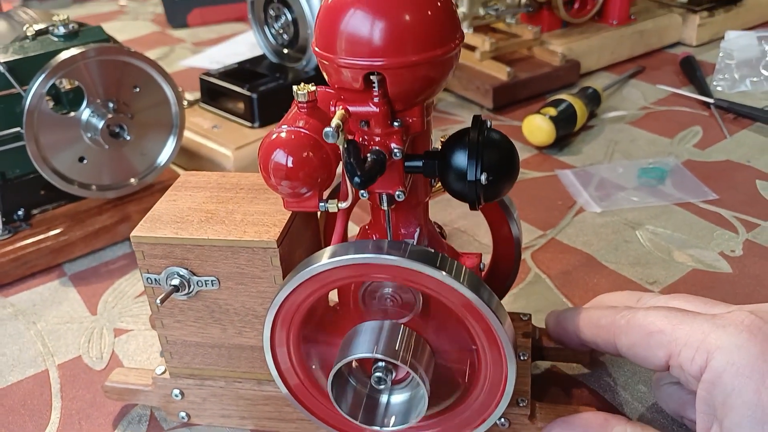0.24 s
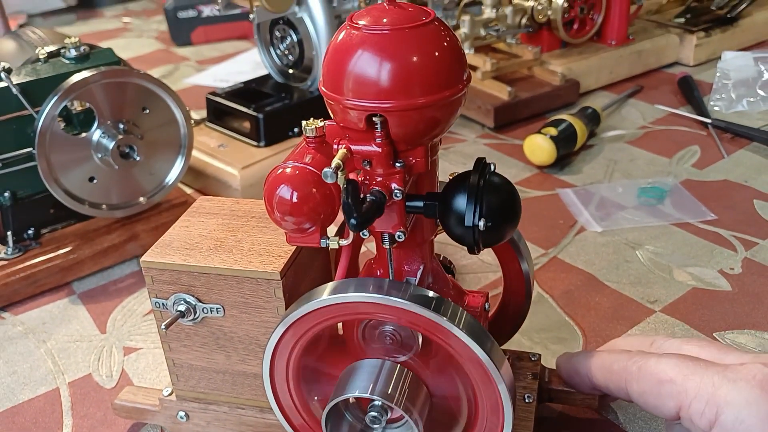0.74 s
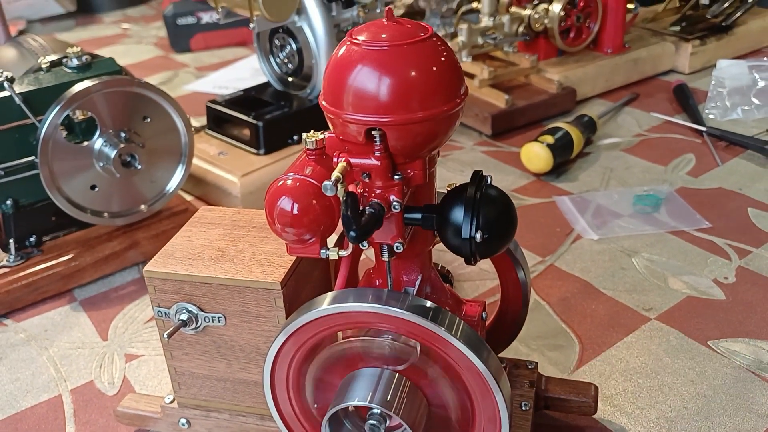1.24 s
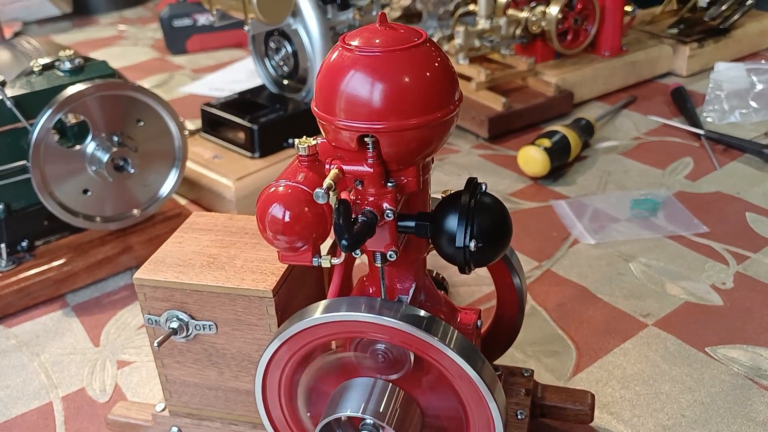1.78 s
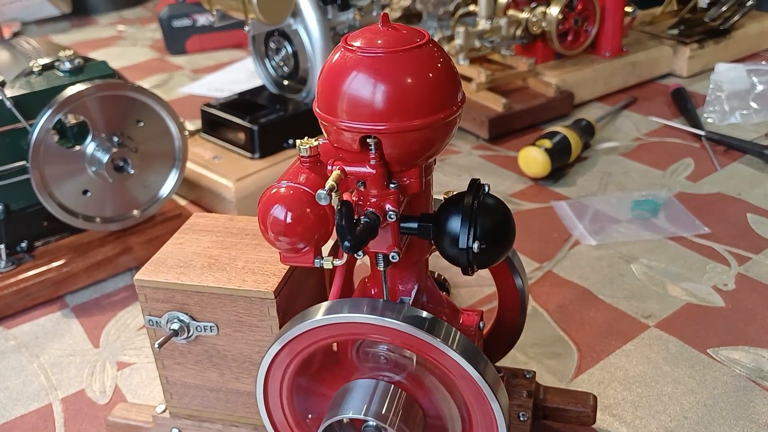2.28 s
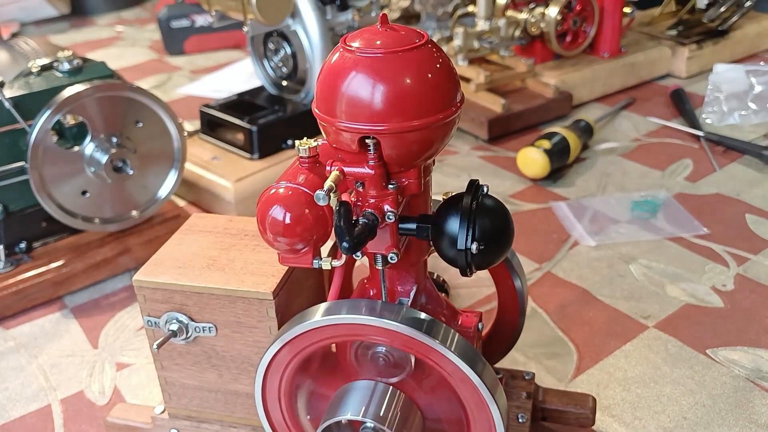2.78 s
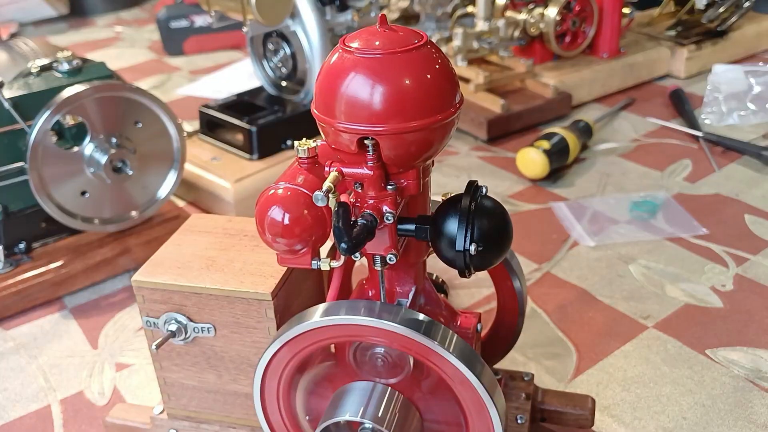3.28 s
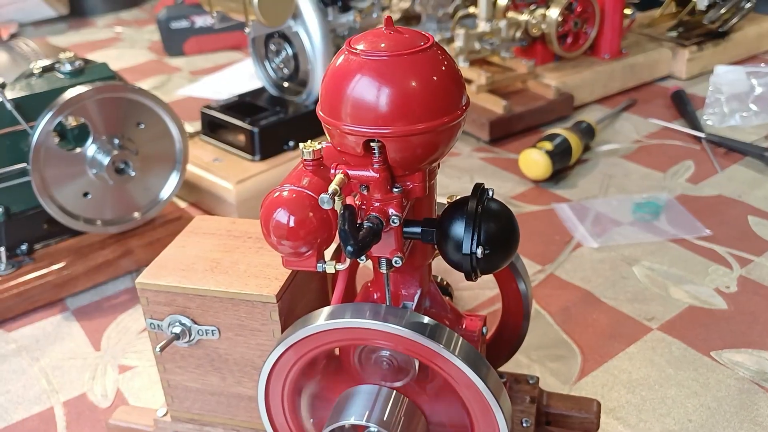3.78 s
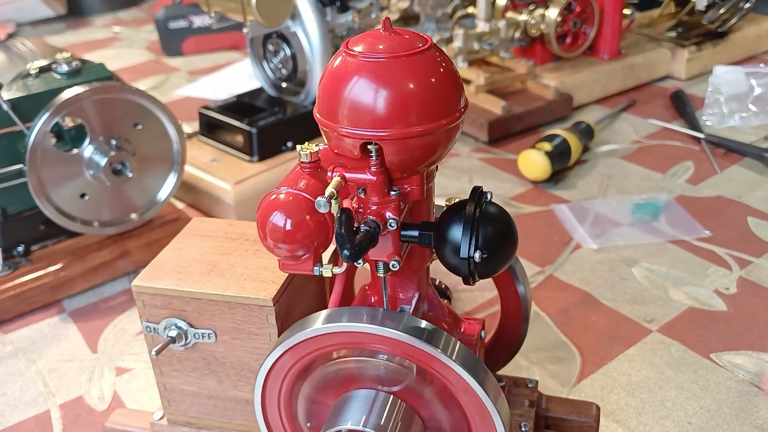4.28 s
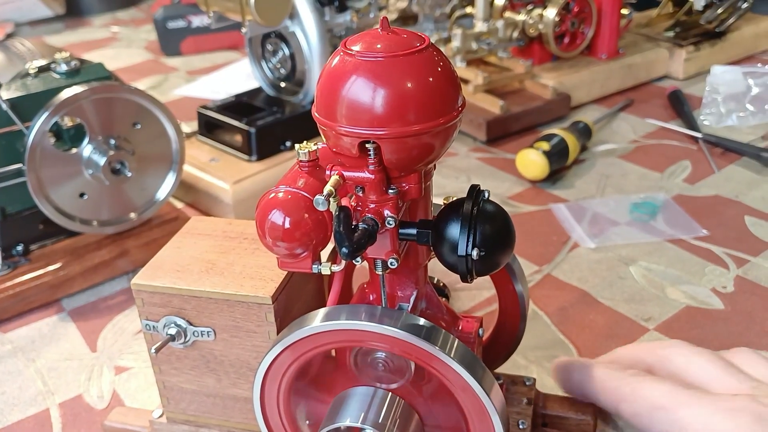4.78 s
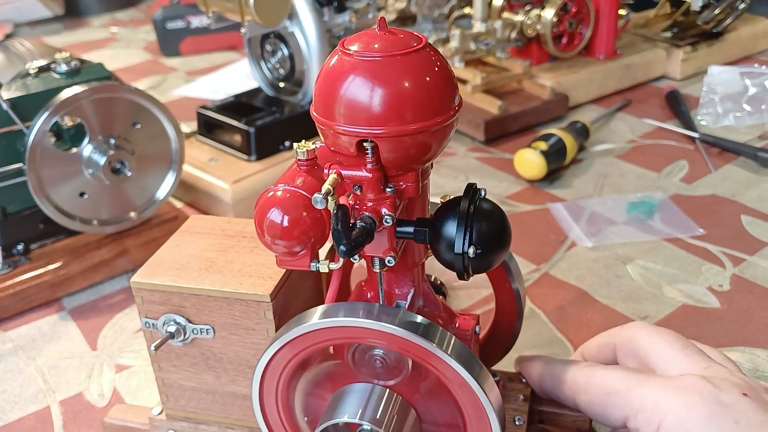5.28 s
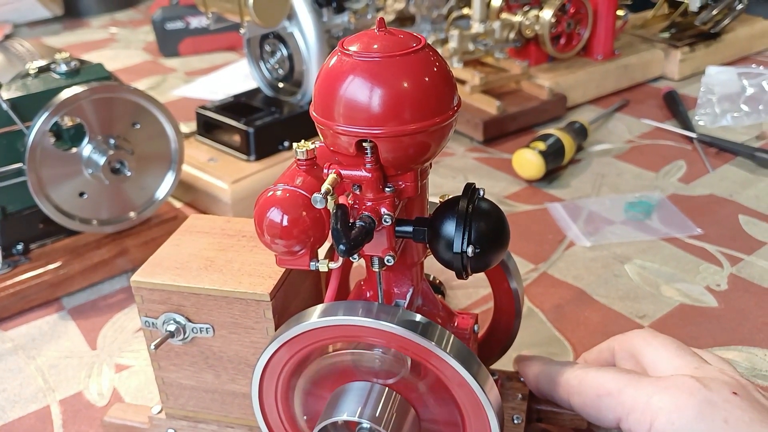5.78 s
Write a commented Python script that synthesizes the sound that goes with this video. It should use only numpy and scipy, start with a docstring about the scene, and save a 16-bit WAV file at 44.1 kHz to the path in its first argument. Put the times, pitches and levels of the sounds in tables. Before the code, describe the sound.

A small hit-and-miss engine runs on a bench, close in stereo, in a small room with a short, faint reverberation. Quick metallic clatter, about twenty strokes a second with alternating accents, slows slightly through each coast. Sharp firings break it: a brief fluttering intake snort with hiss, then a low thump into the bench, a hard crack and, almost at once, a dry exhaust pop. They fall near 0.4, 0.7 and 1.2 seconds, the last followed quickly by a weaker one. A long rattling coast leads to a strong-weak pair at 2.3, then single pops at 3.0 and 3.6, another pair at 4.1, and a heavy thump at 5.0. Three more crowd in at 5.55, 5.75 and 5.9, and clatter continues to the end. Tiny, extremely high squeaks accompany some firings until 5.0. A soft gear whirr and low rumble stay underneath.

```python
"""Small engine on a bench

A small hit-and-miss engine, which fires only now and then, runs on a wooden bench near a stereo microphone.
It coasts with its valve gear clattering twice a turn: short bursts of grainy, metal-coloured noise.
At times the intake valve snorts (low gulps and hiss), the charge fires with a thump into the bench
(fading sine waves and a crack) and the exhaust pops (one gas pulse under a burst of noise).
Some firings bring a high squeak. A small room answers, over a steady whirr and a low rumble."""
import sys
import numpy as np
from scipy import signal
from scipy.fft import rfft, irfft, next_fast_len
from scipy.io import wavfile

SR = 44100
rng = np.random.default_rng(int(sys.argv[2]) if len(sys.argv) > 2 else 0)


def dump(signal):
    """Clip the signal to [-1, 1] and save it as 16-bit WAV at the path in sys.argv[1]."""
    limited = np.clip(np.atleast_2d(signal).T, -1, 1)
    pcm = np.round(limited * 32767).astype(np.int16)
    wavfile.write(sys.argv[1], SR, pcm)


N = 266364  # length of the scene in samples

# Levels in these tables come before the offsets that the functions add.
# In a colour only the shape counts: noise() evens out its overall level.

# firings: start_s, thump_db, rocking_hz, lead_in_click_db, crack_db, clang_db
FIRINGS = [(0.381, -2.5, 118, -19, -15, -16), (0.6832, -4, 131.7, -24, -14.5, -18.5),
           (1.1614, -3, 124, -24, -13, -15), (1.2552, -13.5, 126, -24, -21, -24),
           (2.319, -3.5, 118, -24, -15, -15), (2.4218, -14, 121, -22.5, -24, -23.5),
           (3.009, -4, 117.7, -27, -14.5, -14.5), (3.6083, -2.5, 119, -24, -12, -14),
           (4.1052, -4, 119, -22, -12, -15), (4.2026, -14, 122, -24, -21, -26),
           (4.96, 0, 124.5, -18, -18, -14.5), (5.556, -2.5, 122.3, -18.5, -24, -24),
           (5.7476, -4.5, 119, -23, -15, -23), (5.923, -6.5, 124.6, -26, -13.5, -23)]
# colour of the crack: pitch_hz, level_db per Hz
CRACK_COLOUR = [(300, -33), (700, 7), (1300, -10), (2200, -11), (2700, 0), (3500, -1), (5000, -4.5),
                (8500, -10.5), (12000, -28), (16000, -1)]
# ringing tones of the wooden bench: pitch_hz, level_db, time to fall by 60 dB in s
BENCH_MODES = [(118, -9, 0.14), (142.3, -9, 0.3), (161.8, -6, 0.096), (197, -12.5, 0.044),
               (247.8, -15, 0.16), (340, -14, 0.078), (494, -27.5, 0.028)]
# exhaust pops: start_s, pulse_db, blast_db, treble_db, shake_db
POPS = [(0.399, -5.5, -9, -13, -43), (0.6992, -7.5, -10, -10.5, -30.5), (1.1788, -8, -11, -10.5, -23),
        (1.269, -11.5, -13.5, -12, -30.5), (2.3385, -6, -7, -8, -24), (2.4354, -9, -10, -11, -34),
        (3.0266, -9.5, -10, -12, -24.5), (3.626, -6.5, -9.5, -13, -26), (4.1241, -5.5, -7, -11.5, -24),
        (4.2163, -8, -9.5, -12.5, -29), (4.978, -8.5, -8, -8.5, -29), (5.572, -7.5, -8.5, -10, -41),
        (5.7612, -9, -12, -11.5, -30), (5.935, -6.5, -9, -10.5, -30.5)]
# colours of the gas blast and of the shaking base: pitch_hz, level_db per Hz
BLAST_COLOUR = [(300, 0), (500, -1.5), (900, -10.5), (1500, -4.5), (2070, 3), (2610, 3.5), (3250, -2),
                (5000, -3), (6120, -16), (7410, -13.5), (9490, -21), (11800, -40), (16000, -27)]
SHAKE_COLOUR = [(60, -35), (110, 8.5), (160, -5.5), (260, -2), (400, -6), (600, -29), (1000, -20.5)]
# intake strokes: start_s, flutter_db, air_hiss_db
INTAKES = [(0.3194, -22.5, -29.5), (0.6255, -26, -30.5), (1.1051, -25.5, -29), (1.203, -28.5, -44),
           (2.258, -23, -32.5), (2.367, -28, -35), (2.9505, -24, -32), (3.5497, -24, -30.5),
           (4.049, -25, -32), (4.151, -28, -44), (4.904, -23.5, -29.5), (5.4969, -24.5, -29.5),
           (5.6916, -25.5, -34.5), (5.8715, -24.5, -33)]
# bounces of the intake valve within a stroke: time_ms, level_db
VALVE_BOUNCES = [(-1.5, 9), (6.5, 11.5), (15, 7), (21, -13.5), (31, -7.5)]
# ticks of a loose part late in the intake stroke: start_s, level_db
LOOSE_TICKS = [(0.3325, -23.5), (0.3494, -21), (0.649, -21), (1.1293, -21.5), (1.2231, -22), (2.284, -22),
               (2.387, -23.5), (2.9794, -22.5), (3.5694, -26.5), (4.0703, -24), (4.1715, -21.5),
               (4.928, -26.5), (5.5207, -20), (5.7152, -20.5), (5.8918, -18.5)]
# colour of the valve seat and the rushing air: pitch_hz, level_db per Hz
AIR_COLOUR = [(250, -7.5), (500, 2.5), (1000, -6), (2300, -1.5), (3500, -4.5), (5500, -16.5), (8000, -23),
              (10000, -18)]
# coasting runs between firings: first_knock_s, last_knock_s, stroke_count, scrape_db, knock_db
COASTS = [(-0.058, 0.309, 8, -37.5, -37), (0.468, 0.614, 4, -37, -41.5), (0.759, 1.097, 8, -34.5, -41),
          (1.221, 1.221, 1, -50, -51), (1.325, 2.246, 20, -37, -41), (2.284, 2.284, 1, -33, -54),
          (2.387, 2.387, 1, -43, -46), (2.498, 2.941, 10, -35, -42), (3.089, 3.538, 10, -33.5, -40.5),
          (3.69, 4.036, 8, -36.5, -41), (4.171, 4.171, 1, -46, -53), (4.276, 4.893, 14, -36.5, -41),
          (5.04, 5.485, 10, -36, -39.5), (5.636, 5.682, 2, -37.5, -42.5), (5.819, 5.863, 2, -37, -35.5),
          (5.99, 6.031, 2, -36.5, -39)]
# extra level of the return stroke: scrape_db, knock_db, tick_db
RETURN_DB = (0.85, 1.03, 3)
# change of level a stroke as the flywheels slow: scrape_db, knock_db
GROWTH_DB = (0.174, 0.2445)
# level of the rocker's tick over the scene: time_s, level_db
ROCKER_LEVEL = [(0, -35), (.2, -36), (.45, -38.5), (.88, -32.5), (1.2, -38), (1.42, -35), (1.7, -30.5),
                (1.95, -33.5), (2.15, -38.5), (2.5, -36), (3.1, -38.5), (3.4, -35), (3.55, -39),
                (3.72, -34), (4.02, -39.5), (4.5, -33.5), (5.1, -37), (5.4, -36.5), (5.85, -33),
                (6.04, -37)]
# small sounds within a stroke of the cam, rod and rocker: time_ms, level_db, rise_ms, fall_ms
SCRAPE_STEPS = [(-3, 4, 1.8, 1.63), (-8, 5, 2.7, 1.67), (-13, -2.5, 2.3, 1.8), (15.5, -4, 6.6, 5.4)]
KNOCK_STEPS = [(-12.5, -1, 1.7, 1.9), (-6, -0.5, 1.3, 2), (-1, 9.5, 1.4, 1.52), (3.5, 6.5, 0.68, 2),
               (8, -5.5, 3, 7.7)]
TICK_STEPS = [(-11.5, -5.5, 4.1, 2.2), (-5.5, -1.5, 0.46, 1.5), (-0.5, 4, 0.38, 2.1), (2, 4, 0.39, 1.1),
              (5, 8.5, 0.28, 2), (5.5, -4, 1.5, 6.6)]
# colours of the scrape, knock and tick: pitch_hz, level_db per Hz
SCRAPE_COLOUR = [(900, -25.5), (1500, -4.5), (2000, 2), (2360, 7.5), (2650, 1), (3000, -8), (3900, -4.5),
                 (5000, -8), (8000, -77.5)]
KNOCK_COLOUR = [(150, -14.5), (500, -12), (800, -2), (1100, -6.5), (1310, -3), (1650, 3.5), (2200, -17),
                (3900, -7), (5300, -11.5), (6800, -4), (7400, 1), (8900, -17), (11000, -27)]
TICK_COLOUR = [(3000, -23), (7000, -7), (9000, -15.5), (10800, -3.5), (11800, -1.5), (12600, 0),
               (13700, -5), (14750, -0.5), (16000, -5)]
# squeaks near the top of hearing: start_s, level_db, rise_ms
SQUEAKS = [(.385, -29, 8), (.69, -30, 7), (1.168, -31, 6), (2.378, -40, 14), (3.045, -37, 10),
           (3.066, -24, 11), (3.61, -35, 8), (3.668, -36, 10), (4.14, -26, 12), (4.23, -40, 8),
           (5.0, -28, 12)]
# colour of the squeaks: pitch_hz, level_db per Hz
SQUEAL_COLOUR = [(14800, -45), (15170, -14), (15225, -2), (15280, -8), (15700, -48)]
# ringing tones of the metal parts, laid over every noise colour: pitch_hz, width_hz, level_db above the colour
STEEL_MODES = [(2328, 162, 2), (2554, 43, 3), (1312, 27, 7), (3884, 27, 3), (6810, 53, 7), (7260, 17, -4.5),
               (11790, 130, 7), (14640, 30, 5), (14830, 30, 4)]
# how alike left and right are: pitch_hz, likeness (1 is the same)
ALIKE = [(30, 0.59), (70, 0.87), (300, 0.86), (800, 0.72), (2000, 0.48), (5000, 0.34), (12000, 0.053)]
# how long the room's answer lasts: pitch_hz, time to fall by 60 dB in s
ROOM_DECAY = [(100, 0.35), (500, 0.36), (3000, 0.24), (12000, 0.28)]
# colours of the gears and flywheels and of the building: pitch_hz, level_db per Hz
WHIRR_COLOUR = [(24, -47), (40, -7), (115, -6.5), (215, -13.5), (542, -4), (1120, -12.5), (1300, -6.5),
                (2320, -11.5), (2980, -3.5), (3930, -2.5), (5310, -22), (7000, -18.5), (8990, -40),
                (11600, -14), (16000, -16.5)]
RUMBLE_COLOUR = [(20, -9), (60, 5), (120, -11), (250, -32)]
# a faint hiss near 1 kHz that fades away and slowly returns: time_s, level_db
HISS_LEVEL = [(0, -50), (.2, -48), (.45, -44.5), (.65, -55), (.9, -82), (6.1, -53)]
# how much louder the left port is than the right: pitch_hz, difference_db
LEFT_OVER_RIGHT = [(60, 1), (130, 1), (290, 2.5), (640, -1), (1410, 2), (3100, 0.0), (6820, 1),
                   (15000, 0.0)]

SLOWING_MS = 0.654  # each stroke lasts this much longer than the one before
EARLY_MS = 2.2  # the return stroke knocks early
STROKE_MS = 49.7  # the stroke for which the steps are timed; they stretch with a slower one
TOP_HZ = 15780  # nothing at or above this pitch is kept


def firing():
    """The charge burns: the recoil rocks the base for a few swings, thumps the bench and cracks the bearings."""
    low = np.zeros(N + 2 * SR)
    t = np.arange(SR // 10) / SR
    soft_start = 1 - np.exp(-(t / .006) ** 2)
    for s, db, hz, *_ in FIRINGS:
        rock = np.sin(2 * np.pi * hz * t) * soft_start * amp(-60 * t / 0.14)
        add(low, s - .0044, amp(db - 5.5) * rock)
        add(low, s - .0005, -amp(db - 17) * thud(2.95, bright_db=4.0))
    s, _, _, click_db, crack_db, clang_db = np.transpose(FIRINGS)
    # the lead-in click comes 5.5 ms before the crack
    crack_swells = swells(s[:, None] + [-.0055, 0], np.c_[click_db, crack_db], [1.1, .4], [2.5, 1.6])
    crack = noise(crack_swells, CRACK_COLOUR, 2.0)
    # the cylinder's own band sings on
    clang = noise(swells(s + 0.0019, clang_db, 1.9, 2.9), SCRAPE_COLOUR, 2.9)
    return low[SR:SR + N] + crack + clang


def exhaust():
    """The valve opens: one gas pulse swings through the muffler under a short blast; the base shakes."""
    low = np.zeros(N + 2 * SR)
    t = np.arange(-SR // 100, SR // 100) / SR
    swing = -np.cos(2 * np.pi * 200 * t) * np.exp(-((t - .0007) / .0036) ** 2)
    for s, db, *_ in POPS:
        add(low, s - 1 / 100, amp(db) * swing)
        add(low, s + 0.0018, amp(db - 15.0) * thud(1.64, bright_db=3.0))
    s, _, blast_db, treble_db, shake_db = np.transpose(POPS)
    blast = noise(swells(s + 0.00016, blast_db, 1.85, 1.16), BLAST_COLOUR, 2)
    fizz = noise(swells(s + 0.0019, treble_db, 2.1, 0.88), TICK_COLOUR, 4.8)
    shake = noise(swells(s + 0.011, shake_db, 2.8, 17.2), SHAKE_COLOUR, 6.3)
    return low[SR:SR + N] + blast + fizz + shake


def intake():
    """The sprung valve bounces on its seat while air hisses in; a loose part ticks late in the stroke."""
    s, flutter_db, hiss_db = np.transpose(INTAKES)
    ms, step_db = np.transpose(VALVE_BOUNCES)
    bounce_s = s[:, None] + ms / 1000
    bounce_db = flutter_db[:, None] + step_db
    low = np.zeros(N + 2 * SR)
    t = np.arange(-SR // 100, SR // 100) / SR
    gulp = np.cos(2 * np.pi * 235 * t + 0.41) * np.exp(-(t / .0017) ** 2)
    for at, level in np.broadcast(bounce_s, bounce_db):
        add(low, at + 0.0021 - 1 / 100, amp(level + 1.0) * gulp)
        add(low, at, -amp(level - 9.5) * thud(1.83, bright_db=4.0))
    seat = noise(swells(bounce_s, bounce_db - 6.5, 0.28, 0.79), AIR_COLOUR, 1.2)
    rasp = noise(swells(s + .006, hiss_db - 1.5, 9, 20), AIR_COLOUR, 3)
    hiss = noise(swells(s + 0.023, hiss_db, 40, 30.0), TICK_COLOUR, 4.2)
    loose_s, loose_db = np.transpose(LOOSE_TICKS)
    loose = noise(swells(loose_s, loose_db, 0.091, 0.99), TICK_COLOUR, 1)
    return low[SR:SR + N] + seat + rasp + hiss + loose


def valve_gear():
    """Each stroke the cam scrapes, the rod knocks and the rocker ticks, with play in time and strength."""
    s, stretch, scrape_db, knock_db, tick_db = strokes().T
    parts = [(scrape_db, SCRAPE_STEPS, SCRAPE_COLOUR, 1.2),
             (knock_db, KNOCK_STEPS, KNOCK_COLOUR, 2.5),
             (tick_db, TICK_STEPS, TICK_COLOUR, 3)]
    clatter = 0
    for db, steps, colour, grain_db in parts:
        ms, step_db, rise, fall = np.transpose(steps)
        play = rng.standard_normal((len(s), len(ms), 2))
        at_ms = stretch[:, None] * ms + 0.92 * play[..., 0]
        level_db = db[:, None] + step_db + 1.85 * play[..., 1]
        envelope = swells(s[:, None] + at_ms / 1000, level_db, rise, fall)
        clatter = clatter + noise(envelope, colour, grain_db)
    return clatter


def strokes():
    """Time, stretch and three levels of every coasting stroke; the flywheels lose speed evenly in each run."""
    rows = []
    for first, last, count, *levels in COASTS:
        k = np.arange(round(count))
        is_return = k % 2
        shift = (SLOWING_MS * k ** 2 / 2 - EARLY_MS * is_return) / 1000
        length = (last - first - shift[-1]) / max(k[-1], 1)  # first stroke in s; 0 for a lone stroke
        s = first + shift + length * k
        stretch = (1000 * length + SLOWING_MS * k) / STROKE_MS if length else np.ones(1)
        tick_db = np.interp(s, *np.transpose(ROCKER_LEVEL))
        db = np.c_[levels + np.outer(k, GROWTH_DB), tick_db]
        rows.append(np.c_[s, stretch, db + np.outer(is_return, RETURN_DB)])
    return np.concatenate(rows)


def squeak():
    """A dry joint squeals briefly around some firings: short noise in a narrow, very high band."""
    s, db, rise_ms = np.transpose(SQUEAKS)
    return noise(swells(s, db, rise_ms, 0.48 * rise_ms), SQUEAL_COLOUR, 1.5)


def thud(push_ms, bright_db=0):
    """The bench rings after a soft push; the loose base finds the modes at new strengths and pitches."""
    t = np.arange(SR // 3) / SR
    ring = 0
    for hz, db, t60 in BENCH_MODES:
        # bright_db is added for each octave above 100 Hz
        level_db = db + bright_db * np.log2(hz / 100) + rng.normal(0, 2.5)
        pitch_hz = hz * rng.normal(1, 0.036)
        ring = ring + amp(level_db - 60 * t / t60) * np.sin(2 * np.pi * pitch_hz * t)
    push = np.hanning(max(3, round(push_ms * SR / 1000)))
    return np.convolve(ring, push / push.sum())


def noise(envelope, spectrum, grain_db, metal=1):
    """Grainy stereo noise under an envelope, ringing through a causal colour of unit power gain."""
    hz = np.fft.rfftfreq(2 ** 11, 1 / SR)
    steel_db = sum(top_db / (1 + ((hz - mode_hz) / width) ** 2) for mode_hz, width, top_db in STEEL_MODES)
    db = along(spectrum, hz) + metal * steel_db
    # folding the cepstrum makes a filter that rings only after each input, never before
    cepstrum = irfft(np.log(amp(db)))
    fold = np.r_[1, np.full(2 ** 10 - 1, 2), 1, np.zeros(2 ** 10 - 1)]
    ring = irfft(np.exp(rfft(cepstrum * fold)))
    ring = ring / np.linalg.norm(ring)
    # the grain jumps to a new random level every 32 samples
    jumps = np.repeat(rng.standard_normal(N // 2 ** 5 + 1), 2 ** 5)[:N]
    grain = amp(grain_db * jumps)
    pair = rng.standard_normal((2, N)) * envelope * grain / np.sqrt(np.mean(grain ** 2))
    return ports(pair, lambda hz: rfft(ring, 2 * len(hz) - 2))


def ports(pair, colour=lambda hz: 1):
    """Two unrelated signals, coloured and mixed to the likeness of the two microphone ports."""
    def response(hz):
        turn = np.arccos(np.clip(along(ALIKE, hz), -1, 1)) / 2
        return colour(hz) * np.array([np.cos(turn), np.sin(turn)])
    mid, side = filtered(pair, response)
    return np.array([mid + side, mid - side])


def swells(s, db, rise_ms, fall_ms):
    """An envelope: powers of swells that rise to a top at s and fall away."""
    power = np.zeros(N + 2 * SR)
    t_ms = np.arange(-SR // 50, SR // 12) * 1000 / SR
    for at, level, rise, fall in np.broadcast(s, db, rise_ms, fall_ms):
        shape = np.where(t_ms < 0, np.exp(-(t_ms / rise) ** 2), np.exp(-t_ms / fall))
        add(power, at - 1 / 50, amp(2 * level) * shape)
    return np.sqrt(power[SR:SR + N])


def add(x, s, piece):
    """Mixes piece into x from s seconds on; x starts one second early."""
    x[round((s + 1) * SR):][:len(piece)] += piece


def filtered(x, response):
    """x times a complex response of frequency."""
    m = 2 * next_fast_len(N // 2 + SR // 4)
    return irfft(rfft(x, m) * response(np.fft.rfftfreq(m, 1 / SR)), m)[..., :N]


def along(points, hz):
    """Reads a value between (Hz, value) points on a log pitch axis."""
    f, v = np.transpose(points)
    return np.interp(np.log(hz + 1), np.log(f + 1), v)


def amp(db):
    """dB to gain."""
    return 10 ** (np.asarray(db) / 20)


def room(x):
    """Each frequency of the room's answer dies at its own speed; long waves reach both ports alike."""
    hz, t, z = signal.stft(rng.standard_normal((2, SR // 2)), SR, nperseg=256)
    fade = amp(-60 * t / along(ROOM_DECAY, hz)[:, None])
    tail = ports(signal.istft(z * fade, SR, nperseg=256)[1])[:, :SR // 2]
    late = np.pad(x, ((0, 0), (300, 0)))  # the answer starts 300 samples late
    return signal.fftconvolve(late, tail / np.linalg.norm(tail[0]), axes=1)[:, :N]


def background():
    """The steady whirr of the gears, a faint passing hiss and the rumble of the building, all noise."""
    hiss_db = np.interp(np.arange(N) / SR, *np.transpose(HISS_LEVEL))
    hiss = noise(amp(hiss_db), [(800, -27), (1020, -3), (1170, -5.0), (1300, -27.5)], 0.42)
    whirr = noise(amp(-44), WHIRR_COLOUR, 5.1, metal=.3)
    rumble = noise(amp(-59.5), RUMBLE_COLOUR, 1.4)
    return whirr + hiss + rumble


def scene():
    """The engine in its room over the steady sounds."""
    engine = firing() + exhaust() + intake() + valve_gear() + squeak()
    return engine + amp(-14.0) * room(engine) + background()


def record(dry):
    """The left port is a little nearer and coloured its own way; deep bass drops, peaks clip, the top is cut."""
    lag_s, low_hz = 5.5e-5, 70

    def microphone(hz):
        bass = hz ** 2 / (hz ** 2 + low_hz ** 2)
        colour = amp(along(LEFT_OVER_RIGHT, hz) * np.array([[.5], [-.5]]))
        # left comes half the lag early, right half the lag late
        timing = np.exp(1j * np.pi * hz * lag_s * np.array([[1], [-1]]))
        return bass * colour * timing
    heard = filtered(dry, microphone)
    return filtered(np.clip(heard, -1, 1), lambda hz: hz < TOP_HZ)


dry = scene()
out = record(dry)
dump(out)
```